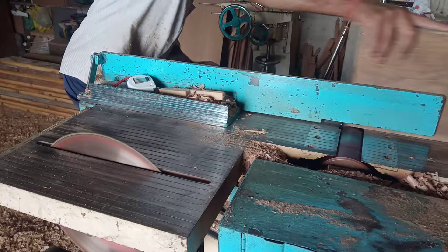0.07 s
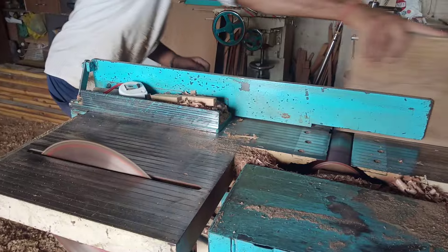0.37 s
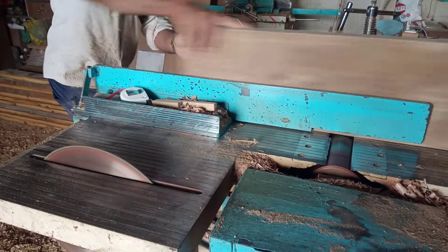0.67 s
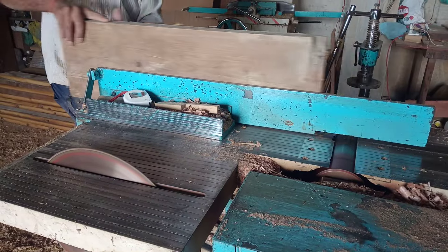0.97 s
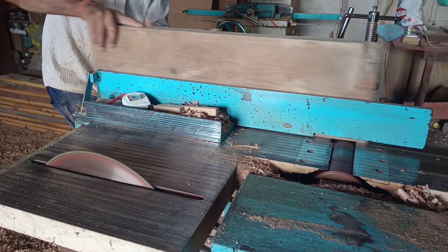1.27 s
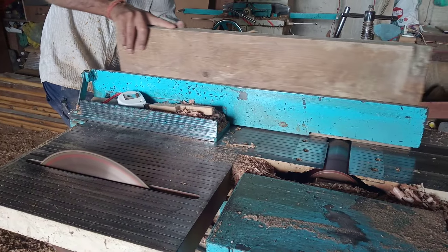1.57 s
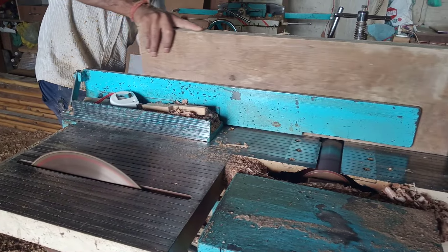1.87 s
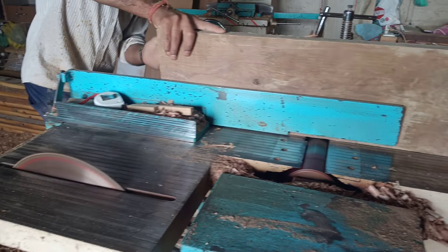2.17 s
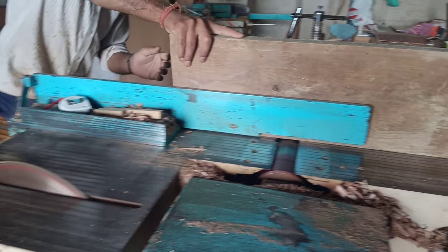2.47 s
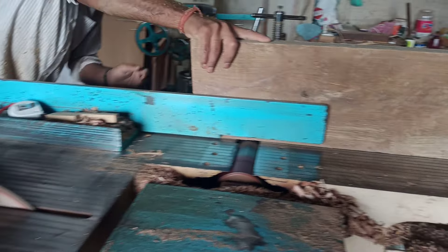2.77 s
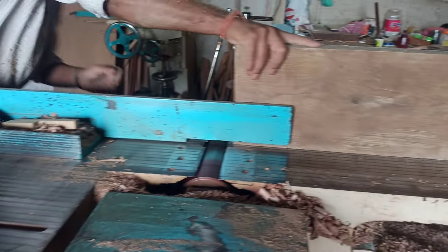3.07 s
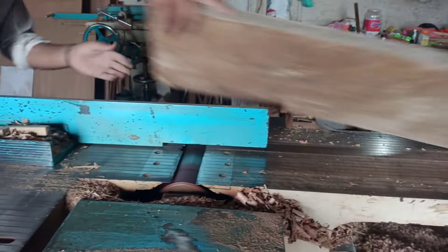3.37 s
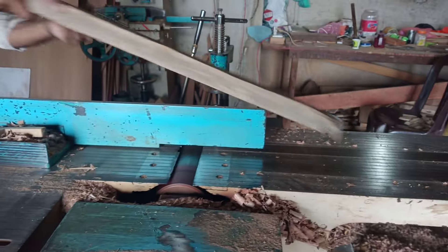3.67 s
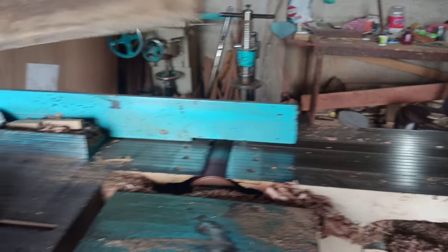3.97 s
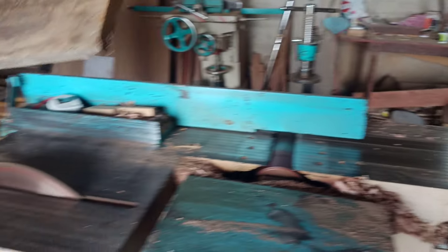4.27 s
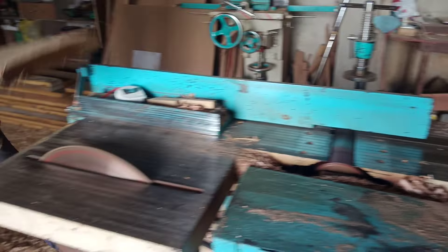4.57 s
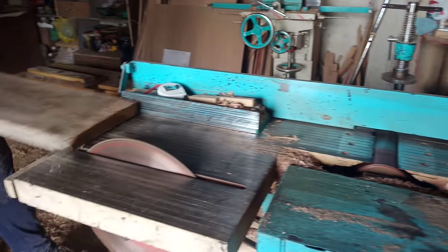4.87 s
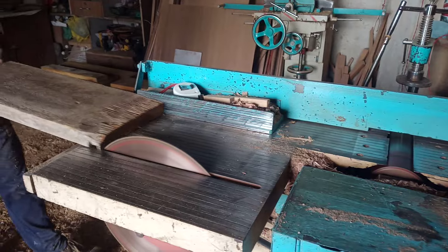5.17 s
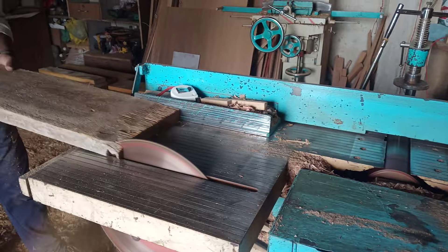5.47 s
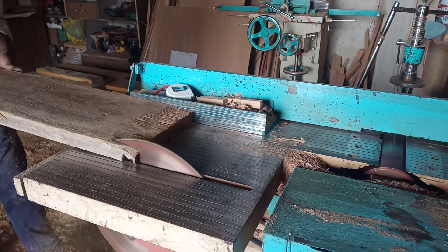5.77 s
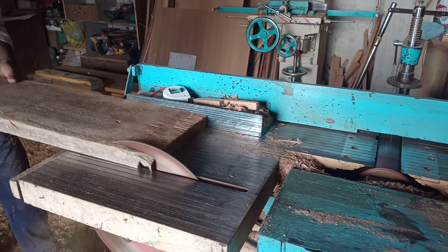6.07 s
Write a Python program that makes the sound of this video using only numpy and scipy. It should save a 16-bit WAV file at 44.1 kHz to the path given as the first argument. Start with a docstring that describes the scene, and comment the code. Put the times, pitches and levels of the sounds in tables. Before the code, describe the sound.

Close up in a small workshop, planer knives tear along a board twice over a constant machine hum and whir. The second cut starts with a knock and lasts longer, whining and snapping through the grain. The machine idles briefly, wood taps the table, and a circular saw bites in with a hissing rasp and metallic ring, its wind and dust buffeting the microphone.

```python
"""A woodworking machine hums and whirs in a small workshop as its two-knife cutter block chops the air.
A board is passed twice over the planer, where the knives tear off chips and set it ringing, then lifted off.
Another board is knocked onto the table and fed into the circular saw, whose teeth rasp through the wood
while the blade rings and throws dust at the close mono microphone. All along, the recorder's gain
control pushes the hum and whir down under loud cuts and lets them swell back."""
import sys
import numpy as np
from scipy import signal
from scipy.fft import rfft, irfft
from scipy.io import wavfile
from scipy.ndimage import uniform_filter1d, minimum_filter1d

SR = 44100
rng = np.random.default_rng(int(sys.argv[2]) if len(sys.argv) > 2 else 0)


def unload_audio(sound):
    """Save the sound as a 16-bit wav file, at the path given as the first command line argument."""
    columns = np.transpose(np.atleast_2d(sound))
    # keep every value between -1 and 1, then stretch to whole-number steps
    steps = np.round(np.clip(columns, -1, 1) * 32767)
    wavfile.write(sys.argv[1], SR, steps.astype(np.int16))


N = 269892
T = np.arange(N) / SR


def amp(db):
    return 10 ** (np.asarray(db) / 20)


def evened(x):
    """Scale a signal to an average power of one."""
    return x / np.sqrt(np.mean(x ** 2) + 1e-20)


def curves(rows):
    """Join a table's rows with straight lines: one curve for each column after the time."""
    times, *columns = np.transpose(rows)
    return [np.interp(T, times, column) for column in columns]


def during(rows, fade_s):
    """One while a table lasts, fading to zero outside it."""
    return np.clip(1 + np.minimum(T - rows[0][0], rows[-1][0] - T) / fade_s, 0, 1) ** 2


def add(mix, start_s, sound):
    part = mix[round(start_s * SR):][:len(sound)]
    part += sound[:len(part)]


def noise():
    return rng.standard_normal(N)


def band(x, lo_hz, hi_hz):
    return signal.sosfilt(signal.butter(3, [lo_hz, hi_hz], "band", fs=SR, output="sos"), x)


def drift(hz):
    """A random wobble, up to about this fast."""
    return evened(irfft(rfft(noise()) / (1 + (np.fft.rfftfreq(N, 1 / SR) / hz) ** 4), N))


def colour(x, points, size=2048):
    """Shape the tone to (frequency [Hz], level [dB]) points, with no ringing ahead of the sound."""
    hz, db = np.transpose(points)
    bins_hz = abs(np.fft.fftfreq(size, 1 / SR))
    log_gain = np.log(amp(np.interp(np.log(bins_hz + 1), np.log(hz), db)))
    taps = np.fft.ifft(np.exp(np.conj(signal.hilbert(log_gain)))).real
    return signal.oaconvolve(x, taps)[:len(x)]


def resonate(x, hz, width_hz):
    """Make a signal ring at a steady or moving pitch."""
    turn = np.exp(2j * np.pi * np.cumsum(hz * np.ones(N)) / SR)
    decay = np.exp(-np.pi * width_hz / SR)
    return evened((turn * signal.lfilter([1], [1, -2 * decay, decay * decay], x / turn)).real)


def burst(points, fade_s, snap, size=8192):
    """A snap and a puff of noise that drops 60 dB in fade_s; its peak is one."""
    puff = rng.standard_normal(size) * amp(-60 * np.arange(size) / SR / fade_s)
    puff[0] = snap * np.linalg.norm(puff)
    puff = colour(puff, points)
    return puff / abs(puff).max()


def workshop(x, fade_s=0.19, size=16384):
    """The cluttered room sends back a short tail of scattered echoes."""
    t = np.arange(size) / SR
    echoes = rng.standard_normal(size) * (rng.random(size) < .06) * (t > .005) * amp(-60 * t / fade_s)
    return signal.oaconvolve(x, echoes / np.linalg.norm(echoes))[:N]


# how often a knife comes by, two to a turn: (time [s], rate [Hz])
KNIFE_RATE = [(1.1, 101.25), (1.5, 101.08), (2.9, 101.06), (3.3, 101.4)]
def knife_count(zero_s=2.0392):
    """Count the knives going by; the belt makes their speed flutter."""
    flutter = 1 + 0.00041 * np.sin(2 * np.pi * 6.3 * T) + 0.00012 * drift(51)
    count = np.cumsum(curves(KNIFE_RATE)[0] * flutter) / SR
    return count - np.interp(zero_s, T, count)


# the hum's higher tones: (pitch [times the knife rate], level above the second tone [dB])
HUM_OVERTONES = [(3, -16), (4, -6), (5, -19), (6, -21.5), (7, -19.5), (8, -16.5), (9, -18.5), (10, -21),
                 (12, -18.5)]
def hum(knives, first_db=-40, second_db=-28, mains_db=-38, mains_hz=100.07, beat_dip_s=1.45):
    """The knives chop the air like a siren; their lowest tone beats against the motor's mains hum."""
    levels = [(2, second_db + .5 * drift(12))]
    levels += [(k, second_db + db + 2.5 * drift(5)) for k, db in HUM_OVERTONES]
    upper = sum(amp(db) * np.cos(2 * np.pi * (k * knives + rng.random())) for k, db in levels)
    first = amp(first_db) * np.cos(2 * np.pi * (knives - np.interp(beat_dip_s, T, knives)))
    mains = amp(mains_db) * np.cos(2 * np.pi * mains_hz * (T - beat_dip_s))
    return np.sqrt(2) * (upper + first - mains)


# the tone of rushing air and bearings: (frequency [Hz], level [dB])
WHIR_TONE = [(30, -41), (60, -18), (90, -6.5), (350, 5.5), (480, -4.5), (650, -2), (950, 0), (1700, 1.5),
             (2000, 9), (2700, -4), (3850, 0), (4700, -12), (7300, -7.5), (9500, -5), (10200, -15.5),
             (16000, -29)]
# whistles of the idling saw blade: (pitch [Hz], width [Hz], level [dB])
BLADE_WHISTLES = [(661, 18, -15.5), (1885, 31, -7.5), (3020, 28, -16), (3650, 130, -14), (5484, 21, -19.5),
                  (5950, 37, -14.5), (6350, 150, -18.5)]
# the microphone swings away from the blade and back: (time [s], change in level [dB])
MIC_NEARNESS = [(0, 0), (2.3, -1), (3.2, -1.5), (3.6, -2), (4.2, 2.5), (5.2, -1)]
def whir(knives, level_db=-25.5):
    """Swirling air throbs with the knives and makes the idling blade whistle."""
    air = evened(colour(noise(), WHIR_TONE)) * (1 + 0.11 * np.cos(4 * np.pi * knives))
    blade = sum(amp(db) * resonate(noise(), hz, np.hypot(width, hz / 50))
                for hz, width, db in BLADE_WHISTLES)
    return amp(level_db + curves(MIC_NEARNESS)[0] + .5 * drift(23)) * (air + blade)


# the blade's wind at the microphone: (time [s], level [dB])
BLADE_WIND = [(5.26, -8.5), (5.36, -9), (5.43, 9.5), (5.56, 6.5), (5.63, -13), (5.8, -31), (5.83, -10),
              (6.12, -2.5)]
# the hardest thuds of dust and air: (time [s], level [dB])
DUST_THUDS = [(5.259, 8.5), (5.379, 13), (5.409, 9), (5.423, 18.5), (5.435, 10.5), (5.471, 19), (5.51, 6),
              (5.568, 17), (6.025, 3)]
# the dull tone of wind and thuds: (frequency [Hz], level [dB])
DUST_TONE = [(25, -33), (50, -14), (75, -0.5), (110, 0), (160, 0.5), (220, -2), (450, -3.5), (900, -10.5),
             (2000, -15), (6000, -41)]
def dust(thuds_per_s=40):
    """The blade's wind rumbles on the microphone and carries dust that thuds against it."""
    wind = amp(curves(BLADE_WIND)[0]) * during(BLADE_WIND, 0.0077)
    out = amp(-5.5) * wind * evened(colour(noise() * amp(4.1 * drift(69)), DUST_TONE))
    small_hits = (rng.random(N) < thuds_per_s / SR) * amp(6 + 2.5 * noise()) * wind
    out += signal.oaconvolve(small_hits, burst(DUST_TONE, fade_s=0.052, snap=0.85))[:N]
    for start_s, db in DUST_THUDS:
        add(out, start_s, amp(db) * burst(DUST_TONE, fade_s=0.052, snap=0.78))
    return out


# wood hitting iron: (time [s], thud level [dB], thud pitch [Hz], thud width [octaves],
# crack level [dB], crack pitch [Hz], fade time [s])
BOARD_KNOCKS = [(1.2873, 7.5, 583, 2.1, 10.5, 3860, .012), (1.287, 15, 294, 2.13, 11, 4050, 0.012),
                (1.2938, 16, 500, 6.3, 14.5, 4200, 0.0027), (1.2952, -10, 600, 2.9, 12, 4440, 0.019),
                (2.85, -1.5, 900, 2.5, 9, 4500, .008), (3.009, -2.5, 240, 1.7, 6, 4070, .01),
                (4.866, -15.5, 900, 0.38, -49, 2600, 0.05), (4.958, -8, 786, 0.41, -11, 2500, 0.13)]
def knocks(crack_octaves=0.56):
    """Boards knock on the iron tables, each time with a low thud and a bright crack."""
    out, hz = np.zeros(N), np.geomspace(50, 16000, 40)
    for start_s, thud_db, thud_hz, thud_octaves, crack_db, crack_hz, fade_s in BOARD_KNOCKS:
        for db, mid_hz, octaves in (thud_db, thud_hz, thud_octaves), (crack_db, crack_hz, crack_octaves):
            hump_db = -12 * np.log1p((np.log2(hz / mid_hz) / octaves) ** 2)
            add(out, start_s, amp(db) * burst([*zip(hz, hump_db)], fade_s, snap=0.51))
    return out


def knife_crack(knives, spread=0.543, overtones=170, size=4096):
    """The crack that every knife repeats; its overtones arrive scattered over part of a stroke."""
    delays = spread * (rng.random(overtones) - .4)
    shape = irfft(np.exp(-2j * np.pi * np.cumsum(delays)), size)
    return evened(np.interp(knives % 1, np.arange(size) / size, shape))


def knife_pulses(knives, high_width, other_width, other_share):
    """One pulse a knife, widths in strokes; one knife sticks out higher and bites harder."""
    from_high, from_other = (knives + 1) % 2 - 1, knives % 2 - 1
    high = np.exp(-(from_high / high_width) ** 2)
    return high + other_share * np.exp(-(from_other / other_width) ** 2)


# steady notes of board and table: (pitch [Hz], width [Hz], level [dB])
BOARD_NOTES = [(701, 74, -17), (801, 60, -19), (1272, 66, -14), (2068, 95, -12), (2140, 71, -5),
               (2668, 200, -6), (3540, 43, -33), (7960, 1500, -43)]
# two ringing notes whose pitch follows which part of the board lies over the knives, one list a pass: # (time
# [s], main pitch [Hz], main level [dB], upper pitch [Hz], upper level [dB])
SLIDING_NOTES = [
    [(.5, 2300, -14, 2960, -9), (.76, 2300, -14, 3020, -13), (.82, 2320, -6, 2970, -7),
     (.91, 2260, 1.5, 2850, -2), (.95, 2330, -10, 3560, -2), (1.05, 2330, -14, 3650, -5)],
    [(1.3, 2290, -0.5, 3460, 2), (1.55, 2270, -6, 3480, -15), (1.85, 2270, -11, 3420, -21),
     (2.2, 2460, -13, 3420, -20), (2.33, 2560, -13, 3610, -4), (2.55, 2530, -8.5, 3570, -5),
     (2.7, 2970, -13, 3700, -11), (3.05, 2960, -5.5, 3800, -9)],
]
def board_ring(blows):
    """Each blow of a knife sets the board and table ringing."""
    steady = sum(amp(db) * resonate(blows, hz, width) for hz, width, db in BOARD_NOTES)
    main_hz, main_db, upper_hz, upper_db = curves(SLIDING_NOTES[0] + SLIDING_NOTES[1])
    main = amp(main_db - 0.5) * resonate(blows + 1.5 * noise(), main_hz, width_hz=180)
    upper = amp(upper_db - 2) * resonate(blows + 0.5 * noise(), upper_hz, width_hz=220)
    return amp(-7) * steady + main + upper


# the board on the planer, one list a pass:
# (time [s], level [dB], extra treble [dB], roughness [0 clean, 1 or more torn])
PLANER_PASSES = [
    [(.42, -32.5, -2, 0.84), (.58, -20.5, -2.5, 1.1), (.78, -17.5, -4, 0.95), (.862, -8.5, -4.5, .9),
     (.925, -20.5, -4, 0.3), (.95, -17, -6, .9), (1.05, -25, -5, 1.1)],
    [(1.315, -13, 3, 1), (1.5, -10.5, -4.5, 0.74), (1.95, -13.5, -3, 0.34), (2.53, -12, -5, 0.03),
     (2.64, -12, 0, 1), (2.95, -10, -1.5, 1), (3.04, -9.5, -5, 0.8), (3.1, -17.5, -9, 1.1)],
]
# the tone of knives cutting wood: (frequency [Hz], level [dB])
CUT_TONE = [(40, -31), (150, -9.5), (1000, -17), (1500, -10.5), (2200, -6.5), (3500, 0.5), (4300, -0.5),
            (5200, -5), (6800, -6), (8100, -2.5), (9300, -9.5), (10200, -14.5), (16000, -20.5)]
def planer(knives, uneven_db=1.5, lag_strokes=0.019, bite_s=0.075, slide_off_s=0.11):
    """Each knife tears off a chip, much like the last; the cut starts fast and dies as the board leaves."""
    # one knife trails slightly, which adds whining tones between those of the knife rate
    knives = knives - lag_strokes * (np.cos(np.pi * knives) < 0)
    bite = evened(0.48 + knife_pulses(knives, 0.16, 0.31, other_share=0.64))
    force = amp(uneven_db * noise())[np.round(knives - knives[0]).astype(int)]
    rough = np.clip(curves(PLANER_PASSES[0] + PLANER_PASSES[1])[2], 0, 1)
    cracks = np.sqrt(1 - rough) * evened(knife_crack(knives) * (1 + 0.27 * np.cos(np.pi * knives)))
    rips = np.sqrt(rough) * bite * noise() * amp(2.2 * drift(900))
    tear = force * (cracks + rips)
    body = evened(band(colour(tear, CUT_TONE), 1620, 5500))
    # the edge entering the wood gives a sharp, very high tick
    edge = evened(knife_pulses(knives, 0.05, 0.056, other_share=0.55))
    ticks = band(0.74 * force * edge * noise() * amp(1.4 * drift(80)), 10100, 17000)
    scrape = (tear + 0.67 * noise()) * bite ** .5
    fizz = evened(band(colour(scrape + ticks, CUT_TONE), 4040, 16500))
    strikes = evened(knife_pulses(knives, 0.0046, 0.0024, other_share=0.49))
    wood = body + board_ring(force * (strikes + rough * noise()))
    out = np.zeros(N)
    for rows in PLANER_PASSES:
        cut_db, treble_db, _ = curves(rows)
        contact = np.clip(1 + (T - rows[0][0]) / bite_s, 0, 1) * during(rows, slide_off_s)
        out += contact * amp(cut_db) * (amp(-1.5) * wood + amp(treble_db) * fizz)
    return out


# knives catching hard in the grain: (time [s], level [dB])
GRAIN_CATCHES = [(0.418, -31), (0.436, -13), (.5357, -9.5), (.5741, -18), (.9413, 3), (1.3647, 0.5),
                 (1.424, -15), (2.6322, 1), (2.7126, 0), (2.771, 3), (3.027, 3.5)]
def splinters(knives, chip_chance=0.36, chip_s=0.0004):
    """A catching knife gives a short rip and a sharp snap; the higher one also flicks off small chips."""
    out = np.zeros(N)
    for start_s, db in GRAIN_CATCHES:
        add(out, start_s, amp(db - 2) * burst(CUT_TONE, fade_s=0.16, snap=.1))
        add(out, start_s + .0008, amp(db + 2.5) * burst(CUT_TONE, fade_s=0.0069, snap=0.3))
    cutting = sum(during(rows, .01) * amp(curves(rows)[0]) for rows in PLANER_PASSES)
    turn = (knives // 2 - knives[0] // 2).astype(int)
    chips = amp(1) * (rng.random(N) < chip_chance)[turn]
    age_s = (knives % 2) / curves(KNIFE_RATE)[0]
    return out + band(cutting * chips * np.exp(-age_s / chip_s) * noise(), 2500, 19000)


# held notes of the saw blade: (start [s], end [s], pitch [Hz], level [dB])
BLADE_SQUEALS = [(5.241, 5.364, 2014, -3.5), (5.26, 5.413, 3590, -10), (5.27, 5.405, 2990, -11),
                 (5.592, 6.078, 1866, -19)]
def squeals(fade_s=0.03):
    """The teeth drive the blade into nearly pure, slightly wavering tones."""
    out = np.zeros(N)
    for start_s, end_s, hz, db in BLADE_SQUEALS:
        swell = np.clip(np.minimum(T - start_s, end_s - T) / fade_s, 0, 1)
        phase = 2 * np.pi * np.cumsum(hz + 7 * drift(58)) / SR
        out += amp(db + 3.5 * drift(70)) * swell * np.sqrt(2) * np.sin(phase)
    return out


# sawing, loudest a moment into the cut, then easing off:
# (time [s], hiss [dB], blade ring [dB], wood body [dB])
SAW_LEVELS = [(5.255, 3, -10, -5.5), (5.36, -4.5, -14, -5.5), (5.44, 7, 6, 7), (5.56, -0.5, -6.5, -6),
              (5.72, -7.5, -8, -8.5), (5.85, -7, -13.5, -16), (6.12, -4, -10, -16)]
# the tone of the saw's hiss: (frequency [Hz], level [dB])
SAW_TONE = [(1060, -25.5), (1800, -8), (2060, -3.5), (2240, -7), (3060, -5), (3320, -8), (3670, -1.5),
            (3990, -6), (4250, -4.5), (5390, -9), (7700, -1.5), (16000, -19.5)]
# notes the blade rings at: (pitch [Hz], level on entering [dB], level deep in the cut [dB])
BLADE_NOTES = [(1880, -2, 3), (2050, -10, -2.5), (2115, -10, 1.5), (2512, 4, -4), (2720, -21, -0.5),
               (2930, -25, 1.5), (3190, 0, 0), (3580, -15, 1.5), (4060, -12, -7), (3900, -21, 4),
               (4340, -3, 0.5), (4670, -17, -21), (4830, -14, -26), (4870, 2.5, -0.5), (5740, 1, -4),
               (6422, -7, -2.5), (7400, -16, -16)]
def saw(knives, deep_s=5.49, sink_s=0.16):
    """Teeth rasp through the wood and ring the blade, whose notes change as the slot closes round it."""
    hiss_db, ring_db, body_db = curves(SAW_LEVELS)
    rasp = noise() * amp(1.3 * drift(500)) * (1 + 0.11 * np.cos(np.pi * knives))
    depth = np.clip(1 + (T - deep_s) / sink_s, 0, 1)
    ring = np.zeros(N)
    for hz, entry_db, deep_db in BLADE_NOTES:
        note_db = entry_db + depth * (deep_db - 4.5 - entry_db)
        ring += amp(note_db) * resonate(noise(), hz, width_hz=14 + hz / 250)
    hiss = amp(hiss_db + 1.76) * evened(colour(rasp, SAW_TONE))
    body = amp(body_db - 6.5) * evened(band(rasp, 580, 1540))
    contact = np.interp(T, [5.234, 5.24, 5.258], [0, .2, 1])
    return contact * (hiss + body + amp(ring_db + 3) * evened(ring))


def scene():
    """The steady machine, the cuts and the knocks in the room, at one microphone."""
    knives = knife_count()
    cutting = planer(knives) + splinters(knives) + saw(knives)
    knocking = knocks()
    room = workshop(amp(-8) * cutting + amp(-14) * knocking)
    mono = hum(knives) + whir(knives) + cutting + squeals() + knocking + room + dust()
    return np.array([mono, mono])


def gain_control(x, target_db=-23, limit_db=-8.5, step=32):
    """The volume sinks under loud cuts and creeps back; a quick limiter ducks just ahead of peaks."""
    steer_per_s, fall_db_per_s, recover_db_per_s, release_db_per_s = 4.8, 60, 6.5, 33
    level_db = 10 * np.log10(abs(uniform_filter1d(x ** 2, size=96)[::step]) + 1e-12)
    loudness_db = uniform_filter1d(level_db, size=28)
    step_s = step / SR
    slow_db, quick_db, duck_db = 0, 0, []
    for level, loudness in zip(level_db, loudness_db):
        excess_db = loudness - slow_db - target_db
        speed = np.clip(steer_per_s * excess_db, -recover_db_per_s, fall_db_per_s)
        slow_db = max(slow_db + speed * step_s, 0)
        quick_db = max(quick_db - release_db_per_s * step_s, level - limit_db)
        duck_db.append(max(slow_db, quick_db))
    gain_db = uniform_filter1d(minimum_filter1d(-np.array(duck_db), size=31), size=31)
    return amp(np.interp(T, T[::step], gain_db))


def record(dry, start_s=0.079, fade_in_s=0.44, ceiling=0.76, top_hz=16100):
    """The recorder fades in, steers its volume, rounds off peaks and drops the highest treble."""
    fade_in = (T > start_s) * (1 - 0.9 * np.exp(-abs(T - start_s) / fade_in_s))
    steered = dry * fade_in * gain_control(dry[0] * fade_in)
    rounded = steered / (1 + (steered / ceiling) ** 6) ** (1 / 6)
    low_pass = signal.firwin(511, top_hz, window=("kaiser", 9), fs=SR)
    return signal.oaconvolve(rounded, low_pass[None], "same")


dry = scene()
out = record(dry)
unload_audio(out)
```